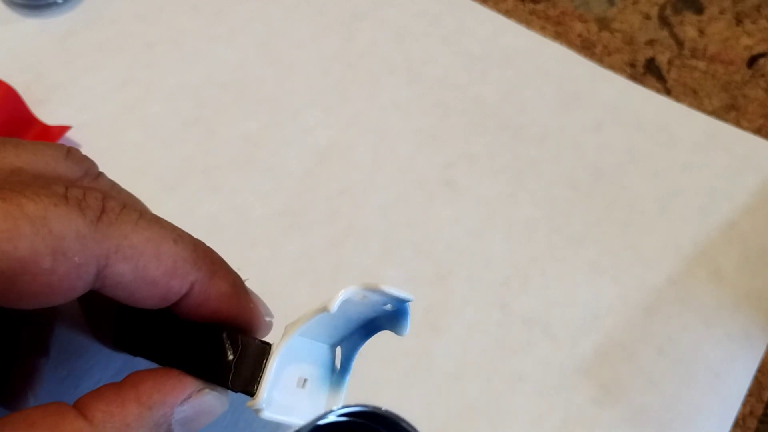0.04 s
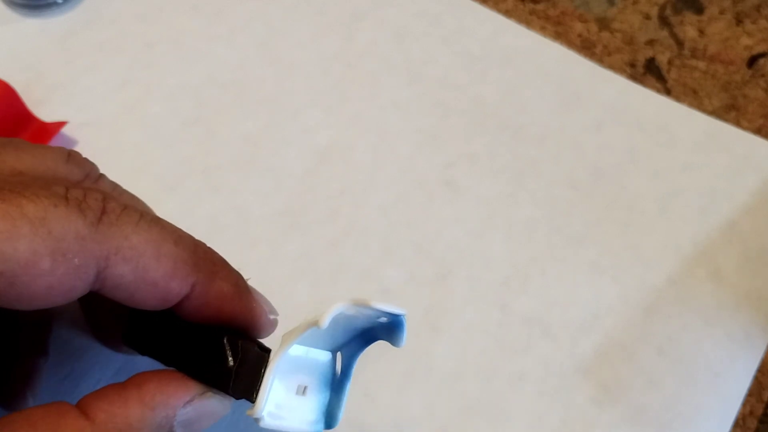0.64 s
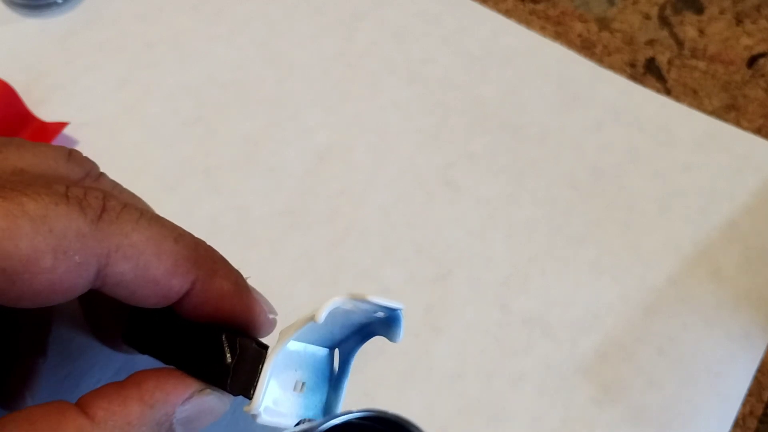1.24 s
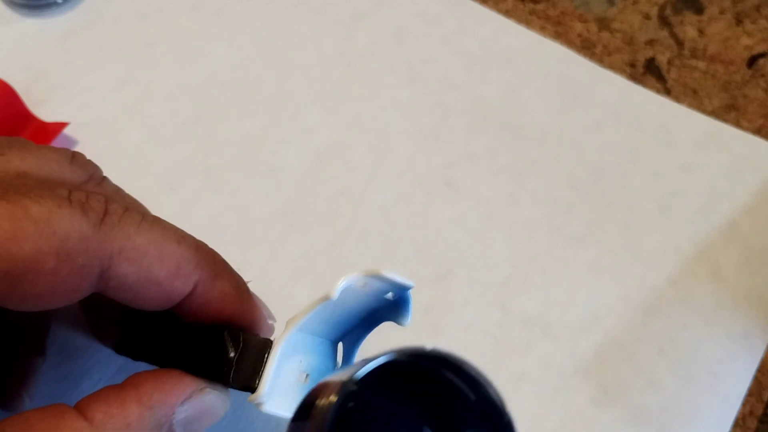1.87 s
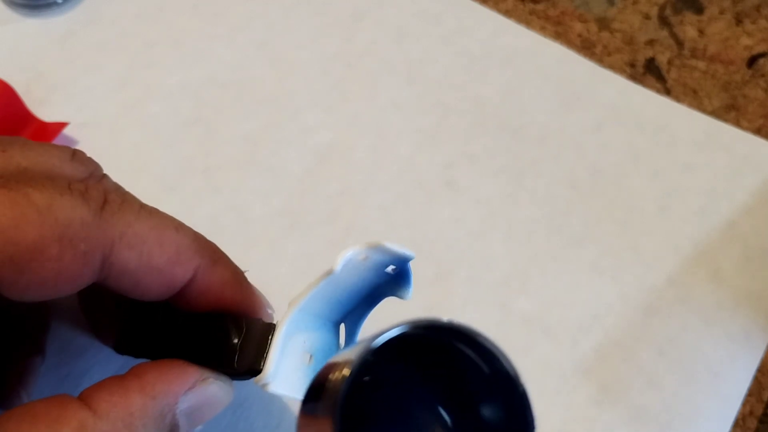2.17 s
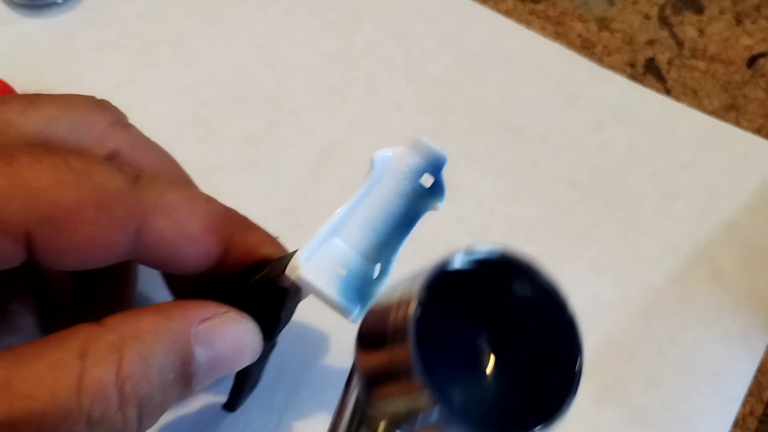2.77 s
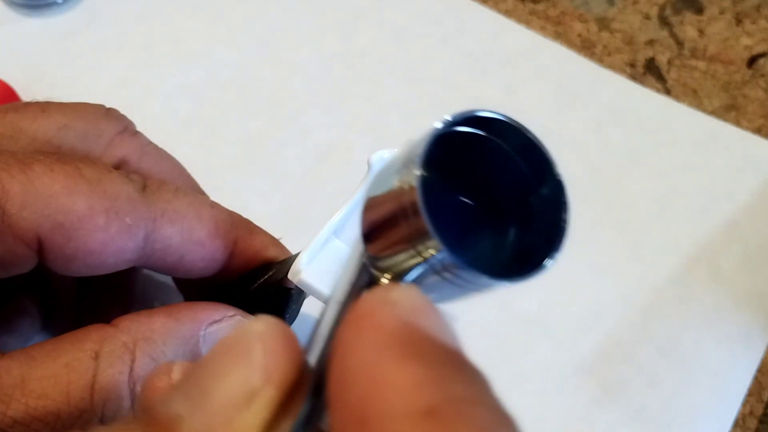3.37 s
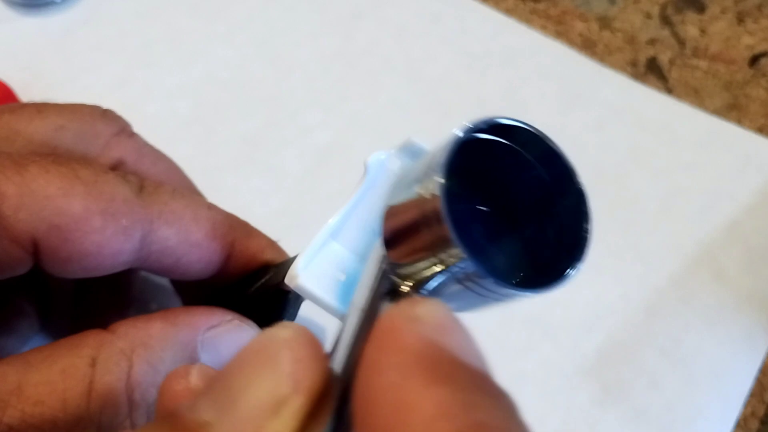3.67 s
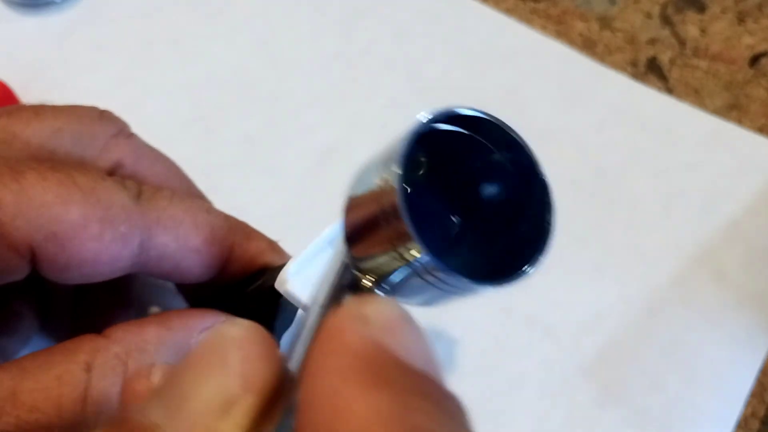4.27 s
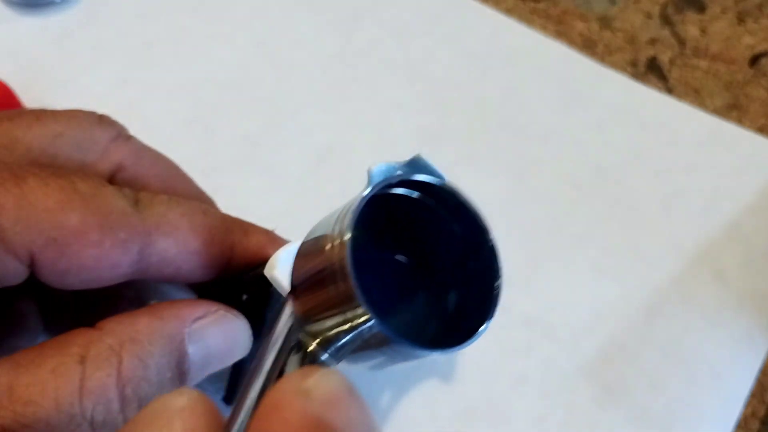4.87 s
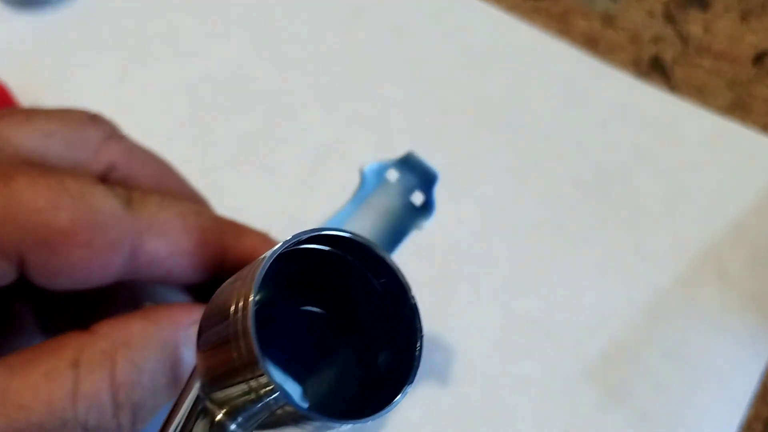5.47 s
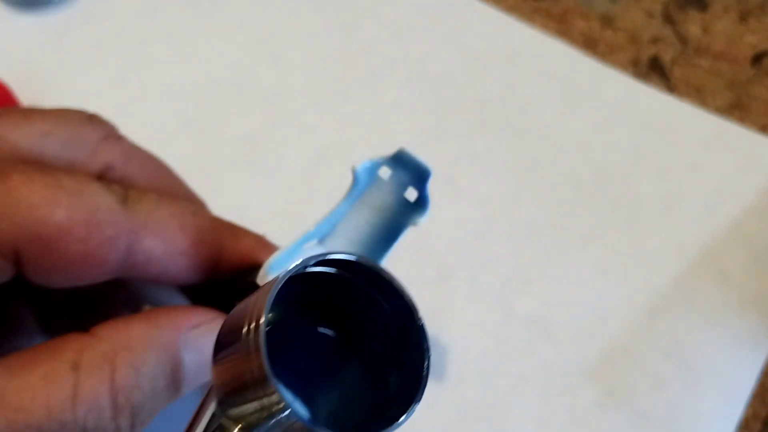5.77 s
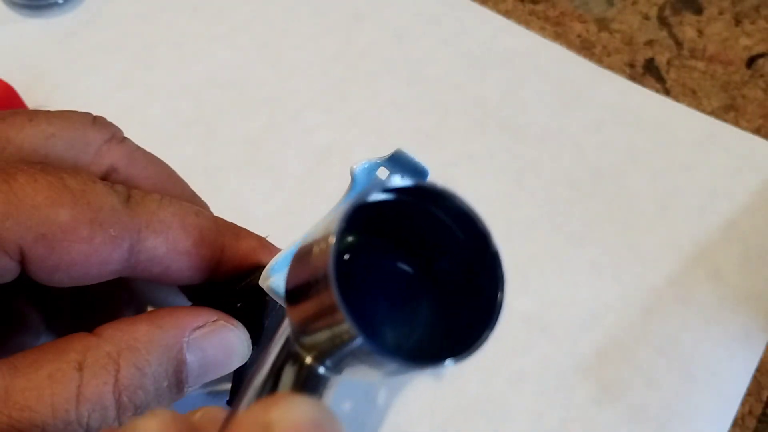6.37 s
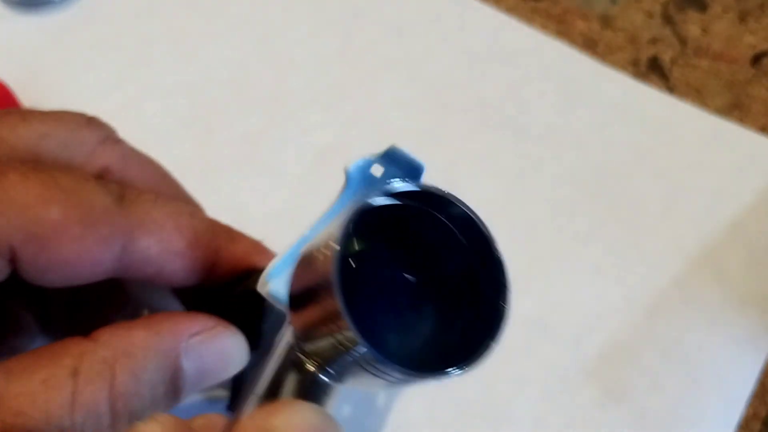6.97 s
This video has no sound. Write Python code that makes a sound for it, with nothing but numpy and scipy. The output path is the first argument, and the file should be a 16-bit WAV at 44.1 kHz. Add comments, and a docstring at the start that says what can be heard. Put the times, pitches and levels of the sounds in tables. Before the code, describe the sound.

Close airbrush hiss in three bursts, broken by one tiny gap and one longer pause in a small, quiet room.

```python
"""A bright, fizzing hiss: an airbrush sprays a small plastic part over paper, close to two microphone ports.
Three presses of the trigger: the nozzle fizzes, the jet roars over a low wash,
and it splashes brightly where it meets the part. Short echoes off part, paper and desk ripple the hiss.
Faint low humming tones swell during the spraying, and stray air puffs against the microphone.
In the longer pause, fingers shift on the holder and a small room hums faintly."""
import sys
import numpy as np
from scipy import signal
from scipy.fft import rfft, irfft, next_fast_len
from scipy.io import wavfile
from scipy.ndimage import map_coordinates

SR = 44100
rng = np.random.default_rng(int(sys.argv[2]) if len(sys.argv) > 2 else 0)


def unload_audio(sound):
    """Save the sound as a 16-bit wav file, at the path given as the first command line argument."""
    columns = np.transpose(np.atleast_2d(sound))
    # keep every value between -1 and 1, then stretch to whole-number steps
    steps = np.round(np.clip(columns, -1, 1) * 32767)
    wavfile.write(sys.argv[1], SR, steps.astype(np.int16))


N = 319284

# trigger presses: valve opens t/s, valve shuts t/s, grip (0 or 1)
PRESSES = [(-.1, .665, 0), (0.75, 2.441, 0), (3.136, 7.4, 1)]
# the jet's aim as fader moves, one table per press: t/s, splash level/dB, roar level/dB, wash level/dB
AIM = [
    [(0.03, -33, -36.5, -50.5), (0.202, -35, -38, -48.5), (0.222, -33, -37.5, -51),
     (0.522, -32, -37, -57.5), (0.604, -43, -44, -60), (0.66, -40, -42, -56.5)],
    [(0.77, -35.5, -39.5, -62), (0.866, -31, -37, -60), (1.014, -30, -39, -52.5), (1.116, -28.5, -35, -53),
     (1.176, -34, -38, -49.5), (1.292, -38, -38.5, -46), (1.722, -38, -40, -49), (1.786, -31.5, -41, -54),
     (2.064, -34, -41.5, -53), (2.166, -39, -45, -53), (2.188, -38, -42.5, -53.5),
     (2.43, -41.5, -45.5, -50.5)],
    [(3.17, -50.5, -46, -61), (3.19, -52, -46, -63), (3.34, -33, -37.5, -56.5), (3.51, -34, -37, -51),
     (3.59, -28, -37, -58), (3.63, -34, -39.5, -57), (3.73, -33.5, -37, -52.5), (4.08, -33.5, -37.5, -51),
     (4.35, -35, -39.5, -55.5), (4.39, -33, -37.5, -53), (4.5, -28, -37, -56.5), (4.86, -32.5, -36.5, -51),
     (4.9, -30.5, -34.5, -50.5), (5.18, -33, -34.5, -46.5), (5.3, -30.5, -36, -49.5),
     (5.53, -36.5, -40, -47), (5.62, -34.5, -39, -49.5), (5.79, -25.5, -38, -51.5),
     (5.93, -25.5, -37.5, -53), (5.99, -26.5, -34.5, -49), (6.07, -38, -40.5, -47),
     (6.29, -38, -41.5, -47.5), (6.46, -35, -40, -52), (6.61, -33.5, -38.5, -47), (6.69, -31, -37, -55),
     (6.77, -33.5, -38.5, -53), (6.93, -30.5, -37.5, -51.5), (7.22, -37, -39, -48.5)],
]
# colours of the jet's five layers, low to high: f/Hz, relative level/dB in grip 0, in grip 1
WASH_EQ = [(90, -30.5, -26), (200, -18.5, -19.5), (388, -11, -8), (510, -9.5, -7.5), (813, -1.5, 1),
           (1000, -5, -2.5), (1400, -3.5, -5), (2500, -42, -51)]
ROAR_EQ = [(350, -63.5, -51), (813, -18, -18.5), (1134, -5, -6.5), (1350, -5.5, -5), (1765, 1.5, -0.5),
           (2210, -1, -2), (2564, 3.5, 3), (2826, -1, -2.5), (3120, -5, -8), (3970, -8, -18),
           (6000, -50, -51)]
SPLASH_EQ = [(2000, -29, -42), (3160, -1.5, -7.5), (3520, -5, -1.5), (3580, -5.5, -7), (4230, -3, -1.5),
             (4650, -3, 0.5), (5160, -1, 2.5), (6350, 1, -3), (6680, -12.5, -3.5), (7950, -23.5, -34),
             (15000, -57, -55)]
MIST_EQ = [(4500, -32, -33), (6510, -11, -5), (7120, 0.5, 2), (8040, -5.5, -0.5), (8660, -4.5, 0),
           (9260, -8.5, 0.5), (10030, -8, -14), (11400, -11.5, -14), (15000, -42.5, -40)]
FIZZ_EQ = [(2000, -22.5, -29), (4000, -3, -18), (8550, 0, -9), (10140, -1.5, 2), (11000, 2.5, 0.5),
           (12500, 1.5, -0.5), (14000, 1.5, 1), (15400, 3.5, 0)]
# mist and fizz ride on the splash, one row per grip: level/dB at the usual splash, growth/(dB per dB)
MIST_RIDE = [(-39, 0.86), (-39.5, 0.81)]
FIZZ_RIDE = [(-35.5, 0.53), (-37, 0.34)]
# how alike the two ports hear the jet: f/Hz, shared power (0-1) in grip 0, in grip 1
PORT_LIKENESS = [(150, 0.47, 0.46), (597, 0.57, 0.68), (1003, 0.83, 0.7), (1510, 0.82, 0.97),
                 (2350, 0.78, 0.84), (3060, 0.76, 1), (3450, 0.64, 0.34), (3900, 0.4, 0.23),
                 (5200, 0.68, 0.86), (6200, 0.5, 0.91), (6800, 0.23, 0.4), (8000, 0.43, 0.31),
                 (10000, 0.4, 0.26), (15000, 0.4, 0.22)]
# shading by the camera's body: f/Hz, left-right level/dB in grip 0, in grip 1
BODY_SHADE = [(200, -1, -1), (700, 0.5, 0.5), (1620, 2, 0.5), (2050, -0.5, -1.5), (2450, 0.5, -0.5),
              (2900, -2, -4.5), (3500, 1, -1), (4700, 0, 0), (6300, -3, -1.5), (8000, -1.5, 0.5),
              (10450, -2.5, -2), (15000, -2.5, -3.5)]
# the left port hears the nozzle first, one table per grip: f/Hz, phase lead/rad
LEFT_LEAD = [
    [(0, 0), (1460, 1.73), (1890, 1.88), (2930, 4), (3700, 2.5), (4050, 7), (5600, 5.5), (6980, 10.5),
     (7240, 9), (8790, 10.0), (10200, 13.5), (11400, 14), (14200, 18), (16200, 22)],
    [(0, -0.5), (1460, 1.46), (1890, 1.4), (2150, 2), (2600, 2.5), (3050, 2.5), (4200, 4.5), (5340, 5.5),
     (6120, 7), (6460, 8), (8010, 8.5), (9300, 9.5), (11500, 13), (16200, 15)],
]
# the airbrush drifts across the ports: t/s, left-right level/dB
PAN_DRIFT = [(0, 3.3), (.8, 2.2), (1.55, 4), (1.95, 3), (3.3, 4), (4.65, 4.5), (5.6, .8), (6.3, 3.5),
             (6.8, 5.5), (7.24, 3)]
# turning the part moves the glance off it and a bright band in the fizz: t/s, delay/ms, band f/Hz
PART_TURN = [(.6, .92, 14900), (.9, .9, 11000), (1.13, .92, 11000), (1.3, 0.56, 15000), (1.8, .61, 12200),
             (2.44, .6, 12200), (3.4, 0.37, 11200), (4.8, 0.42, 11300), (5.25, 0.565, 11000),
             (5.4, .93, 14300), (5.63, .96, 14300), (5.8, 0.35, 12500), (6.12, 0.62, 10800)]
# bounce off the paper: delay/ms in grip 0, in grip 1
PAPER_DELAY_MS = [1.44, 1.63]
# faint low humming tones that swell while the airbrush sprays: t/s, level/dB, half length/s, f/Hz
HUM_SWELLS = [(1.32, -61, 0.21, 382), (1.55, -68, 0.54, 192.8), (3.352, -68, 0.19, 190.6)]
# swells of air on the microphone and of fingers on the holder: t/s, level/dB, half length/s
PUFF_CUES = [(.245, -51, .014), (.357, -43, .012), (.452, -50, 0.028), (.96, -43.5, 0.0095),
             (1.01, -59, 0.029), (5.162, -46, 0.0088), (5.435, -47, 0.022), (5.508, -38, 0.0089),
             (6.475, -48.5, .026), (6.57, -55.5, 0.037)]
RUB_CUES = [(2.639, -71, .004), (2.752, -69, .024), (2.9, -77, .1)]
# colours of the puffs, the draught, the finger rubs and the room's air: f/Hz, relative level/dB
PUFF_EQ = [(15, -47), (28, -24.5), (50, -10), (85, 4.5), (130, 0.5), (200, -12.5), (320, -31), (800, -74.5)]
DRAUGHT_EQ = [(15, -54), (30, -32), (50, -15.5), (85, -2), (130, -1), (200, -4.5), (320, -19), (800, -64)]
RUB_EQ = [(800, -25), (2500, -5), (3600, 0), (5200, -6.5), (7200, -1), (10000, -7), (15000, -12)]
ROOM_AIR_EQ = [(15, -50), (30, -28.5), (50, -23), (95, -3), (190, -7.5), (330, -12), (450, -8),
               (650, -12.5), (1660, -19.5), (6050, -23.5), (15500, -33.5)]
# the room's tail: f/Hz, t60/s
ROOM_DECAY = [(200, 0.58), (2000, 0.31), (6000, 0.29), (15000, 0.23)]
# partials of the machine hum: f/Hz, level/dB
HUM_PARTIALS = [(100, -86), (194, -80.5), (248, -83.5)]

USUAL_SPLASH_DB, USUAL_PAN_DB, MIST_DB_PER_PAN_DB = -34, 4, 0.64
TIME = np.arange(N) / SR
FFT_SIZE = next_fast_len(N + 8192)
FFT_HZ = np.fft.rfftfreq(FFT_SIZE, 1 / SR)


def airbrush():
    """Five layers of jet noise; the harder the jet hits the part, the more splash, mist and fizz."""
    out = np.zeros((2, N))
    pan_db, = curves(PAN_DRIFT)
    facing_db = MIST_DB_PER_PAN_DB * (pan_db - USUAL_PAN_DB)  # turned left, the nozzle shows more mist
    for grip in range(2):
        wash = amp(1.5) * turbulence(WASH_EQ, grip, sputter_db=.5, flutter_db=.57)
        roar = amp(-.5) * turbulence(ROAR_EQ, grip, sputter_db=.5, flutter_db=.5)
        splash = turbulence(SPLASH_EQ, grip, sputter_db=.5, flutter_db=.62)
        mist = amp(facing_db) * turbulence(MIST_EQ, grip, sputter_db=2.5, flutter_db=1.03)
        fizz = bright_band(turbulence(FIZZ_EQ, grip, sputter_db=4, flutter_db=.1))
        for (opens, shuts, press_grip), aim in zip(PRESSES, AIM):
            if press_grip == grip:
                splash_db, roar_db, wash_db = curves(aim)
                jet = amp(wash_db) * wash + amp(roar_db) * roar + amp(splash_db) * splash
                jet += ride_splash(splash_db, *MIST_RIDE[grip]) * mist
                jet += ride_splash(splash_db, *FIZZ_RIDE[grip]) * fizz
                out += near_echoes(valve(opens, shuts) * jet, PAPER_DELAY_MS[grip])
    return out * amp([pan_db / 2, -pan_db / 2])


def turbulence(eq, grip, sputter_db, flutter_db):
    """Jet noise at both ports: a direct part that sputters, and a part scattered by hands and desk."""
    sides = np.array([[1], [-1]])
    sputter = amp(sputter_db * wobble(900))
    direct = rfft(rng.standard_normal(N) * sputter / np.sqrt(np.mean(sputter ** 2)), FFT_SIZE)
    lead_rad = np.interp(FFT_HZ, *np.transpose(LEFT_LEAD[grip]))
    direct = direct * np.exp(sides * 1j * lead_rad / 2)
    scattered = rfft(rng.standard_normal((2, N)), FFT_SIZE)
    shared = along(PORT_LIKENESS, FFT_HZ, grip)
    blend = np.sqrt(shared) * direct + np.sqrt(1 - shared) * scattered
    colour = amp(along(eq, FFT_HZ, grip) + sides * along(BODY_SHADE, FFT_HZ, grip) / 2)
    pair = irfft(blend * colour, FFT_SIZE)[:, :N]
    return unit(pair * amp(flutter_db * wobble(35)))


def valve(opens, shuts, rise_s=.0091, fall_s=.0068):
    """Air comes on within milliseconds and bleeds away when the trigger is let go."""
    attack = np.clip((TIME - opens) / rise_s, 0, 1)
    return attack * np.exp(-np.maximum(TIME - shuts, 0) / fall_s)


def blowing():
    """The air's gate: near 1 while the trigger is held, 0 in the pauses."""
    return sum(valve(opens, shuts) for opens, shuts, _ in PRESSES)


def ride_splash(splash_db, usual_db, growth):
    """Gain of a layer that rises and falls with the splash."""
    return amp(usual_db + growth * (splash_db - USUAL_SPLASH_DB))


def bright_band(fizz, width_hz=560, boost_db=2):
    """A gentle bell boost slides through the treble as the part is turned."""
    hz, t, spectrum = signal.stft(fizz, SR, nperseg=256)
    turn_s, _, centre_hz = np.transpose(PART_TURN)
    bell = np.exp(-.5 * ((hz[:, None] - np.interp(t, turn_s, centre_hz)) / width_hz) ** 2)
    return unit(signal.istft(spectrum * amp(boost_db * bell), SR, nperseg=256)[1][:, :N])


def near_echoes(jet, paper_ms, glance_db=-20, paper_db=-24, desk_db=-20):
    """The jet plus its bounces off part, paper and desk; moving hands slide ripples through the hiss."""
    glance_ms, _ = curves(PART_TURN)
    out = jet + amp(glance_db) * delayed(jet, glance_ms) + amp(paper_db) * delayed(jet, paper_ms)
    sway_ms = .039 * wobble(1.32)
    for desk_ms in np.geomspace(3, 14, 6) * rng.uniform(.85, 1.15, 6):
        bounce = [delayed([port], desk_ms + sway_ms + rng.uniform(-.15, .16)) for port in jet]
        out += amp(desk_db) * np.vstack(bounce)
    return out


def swelling_hum():
    """Faint low humming tones that waver, swell and fade while the airbrush sprays."""
    tones = np.zeros(N)
    for *cue, hz in HUM_SWELLS:
        phase = 2 * np.pi * np.cumsum(hz + 4 * wobble(20)) / SR
        tones += swells([cue]) * np.sin(phase)
    return np.sqrt(2) * blowing() * tones


def stray_air():
    """A light draught brushes each port while the valve is open, with a few stronger puffs."""
    draught = amp(-68 + 1.5 * wobble(4)) * blowing() * noise(DRAUGHT_EQ, shared=.15)
    return draught + swells(PUFF_CUES) * noise(PUFF_EQ, shared=.05)


def fingers():
    """Soft, bright rubs as fingers shift on the holder."""
    return swells(RUB_CUES) * noise(RUB_EQ, shared=.28)


def room_tail(jet):
    """The small room's short reverb, its treble dying first."""
    hz, t, spectrum = signal.stft(rng.standard_normal((2, SR // 2)), SR, nperseg=256)
    decay = amp(-60 * t / along(ROOM_DECAY, hz)[:, None])
    tail = signal.istft(spectrum * decay, SR, nperseg=256)[1]
    return signal.fftconvolve(jet, tail / np.linalg.norm(tail[0]), axes=1)[:, :N]


def room_tone():
    """A bed of room air and unsteady machine hum."""
    hum = np.zeros(N)
    for hz, db in HUM_PARTIALS:
        gain = amp(db + 1.5 * wobble(10))
        hum += gain * np.sin(2 * np.pi * hz * TIME + 1.4 * wobble(9.7))
    return amp(-71.5) * noise(ROOM_AIR_EQ, shared=.25) + np.sqrt(2) * hum


def amp(db):
    """Decibels to gain."""
    return 10 ** (np.asarray(db) / 20)


def unit(pair):
    """Scale a stereo pair so that its mid signal has rms 1."""
    return pair / np.sqrt(np.mean(pair.mean(0) ** 2) + 1e-20)


def along(table, hz, column=0):
    """One value column of a frequency table, read on a log axis."""
    knots_hz, *values = np.transpose(table)
    return np.interp(np.log(hz + 1), np.log(knots_hz + 1), values[column])


def curves(rows):
    """An automation curve for each column after the time."""
    knots_s, *columns = np.transpose(rows)
    return [np.interp(TIME, knots_s, column) for column in columns]


def wobble(rate):
    """A smooth random curve, rate knots a second."""
    return map_coordinates(rng.standard_normal(int(N * rate / SR) + 4), [TIME * rate])


def swells(cues):
    """An envelope with a bell-shaped swell for each cue."""
    return sum(amp(db) * np.exp(-.5 * ((TIME - peak_s) / half_s) ** 2) for peak_s, db, half_s in cues)


def filtered(x, gain):
    """x through an EQ with one gain for each of FFT_HZ."""
    return irfft(rfft(x, FFT_SIZE) * gain, FFT_SIZE)[..., :N]


def noise(eq, shared):
    """Coloured stereo noise, partly shared by both ports."""
    pair = np.sqrt(shared) * rng.standard_normal(N) + np.sqrt(1 - shared) * rng.standard_normal((2, N))
    return unit(filtered(pair, amp(along(eq, FFT_HZ))))


def delayed(ports, ms):
    """Each port behind a steady or moving delay."""
    return np.array([np.interp(TIME - ms / 1000, TIME, port, left=0) for port in ports])


def scene():
    """The mix: the jet up front with a touch of room, then hum swells, stray air, fingers, room tone."""
    jet = airbrush()
    return jet + amp(-18) * room_tail(jet) + swelling_hum() + stray_air() + fingers() + room_tone()


def record(dry, low_cut_hz=36, top_hz=15900):
    """The microphone rolls off the deep bass, and its treble falls steeply at the band limit."""
    low_cut = FFT_HZ ** 2 / np.hypot(FFT_HZ ** 2, low_cut_hz ** 2)
    high_cut = np.clip((top_hz - FFT_HZ) / 250 + .5, 0, 1) ** 2
    return filtered(filtered(dry, low_cut), high_cut)


dry = scene()
out = record(dry)
unload_audio(out)
```